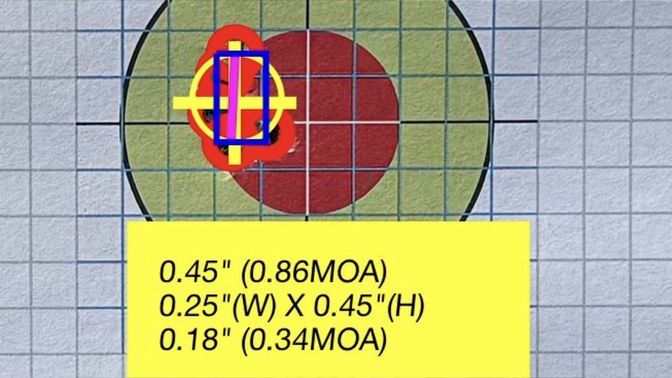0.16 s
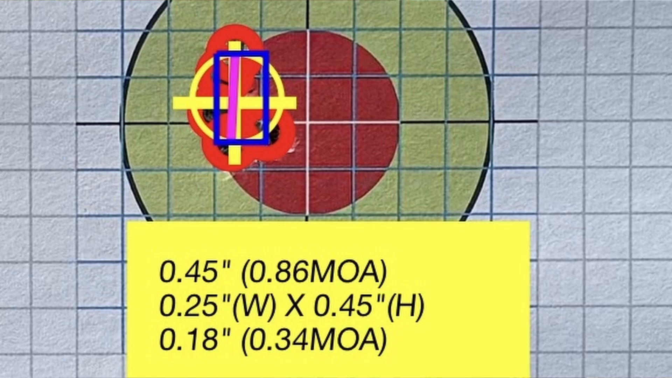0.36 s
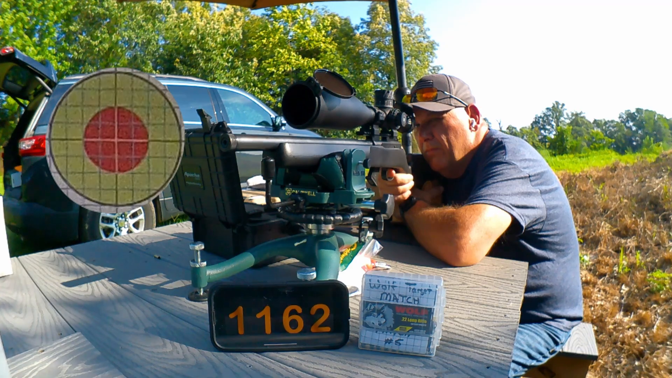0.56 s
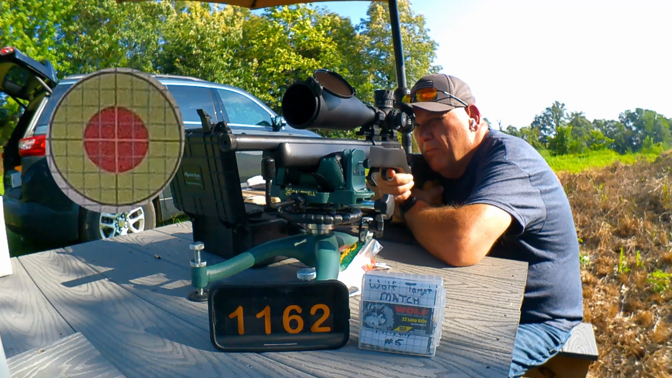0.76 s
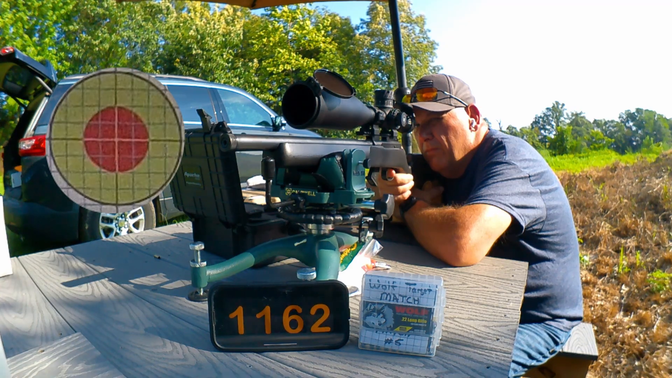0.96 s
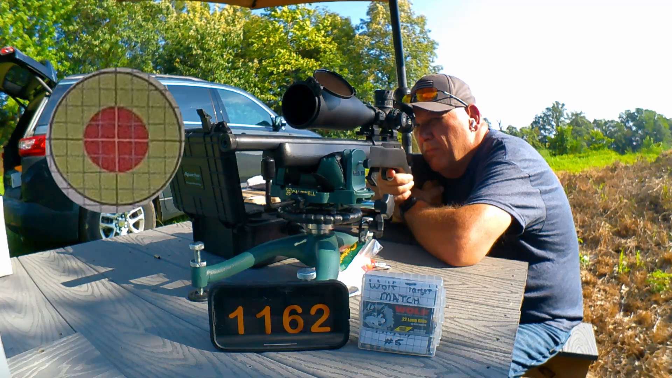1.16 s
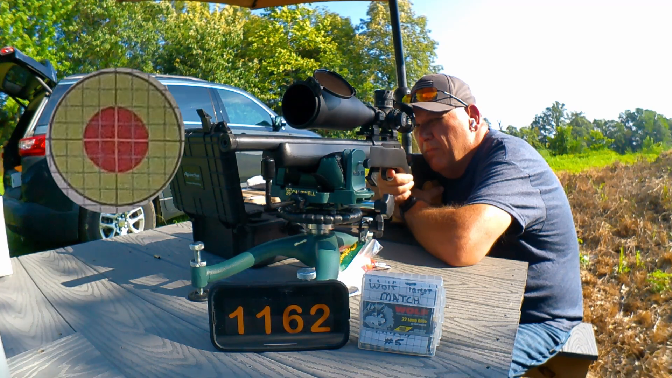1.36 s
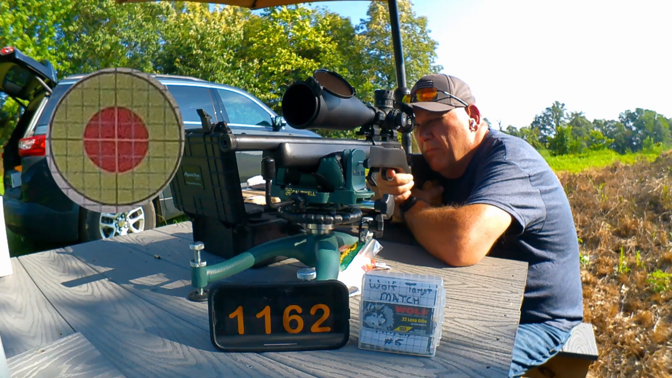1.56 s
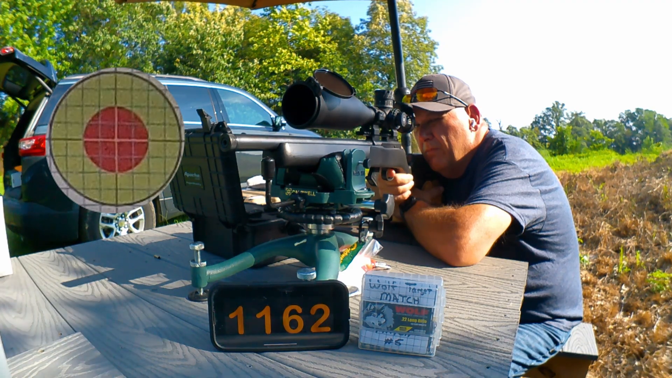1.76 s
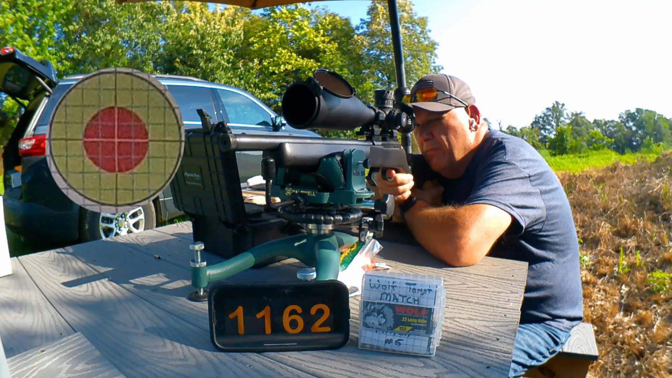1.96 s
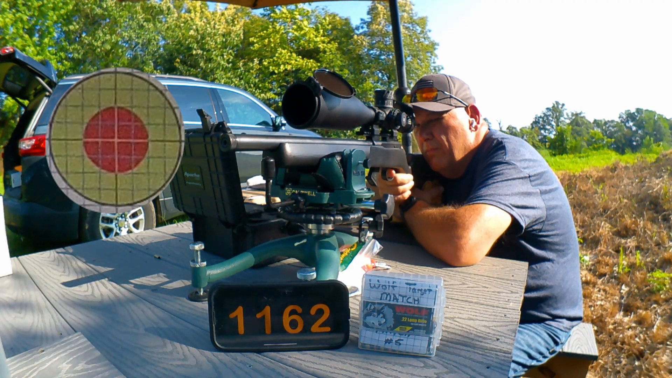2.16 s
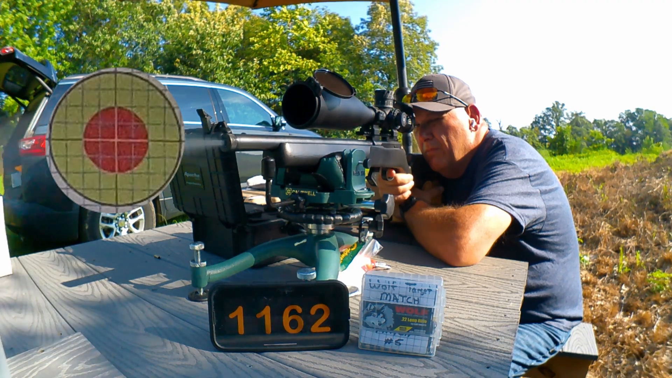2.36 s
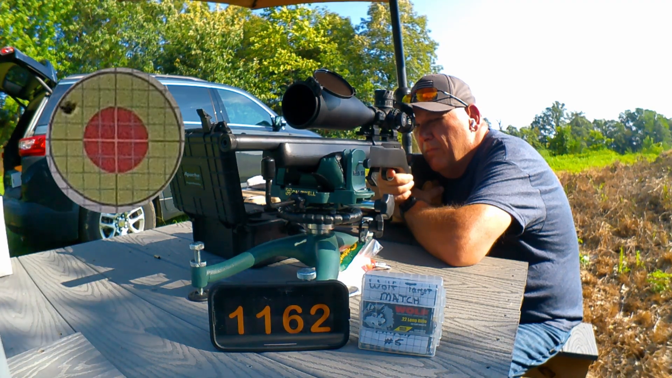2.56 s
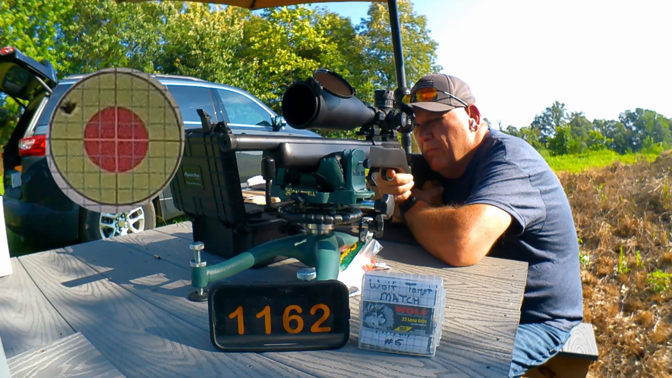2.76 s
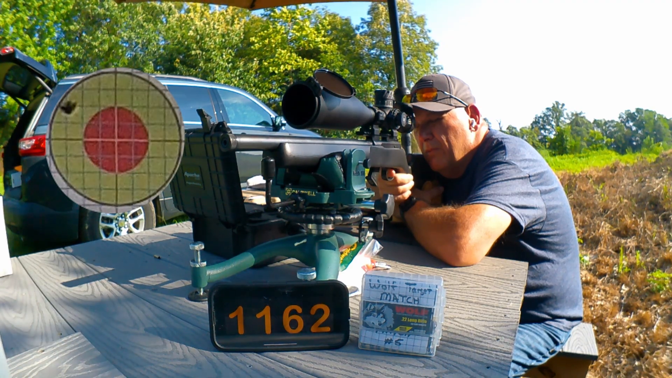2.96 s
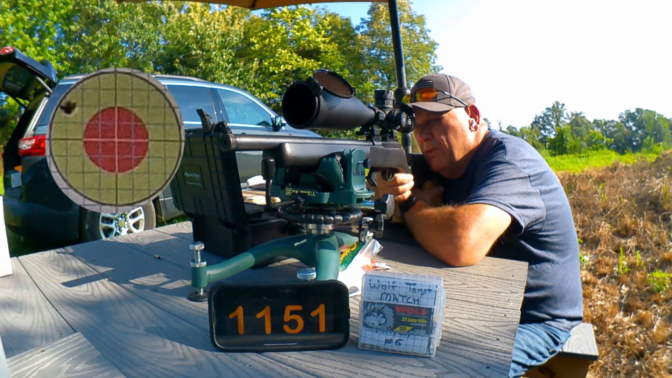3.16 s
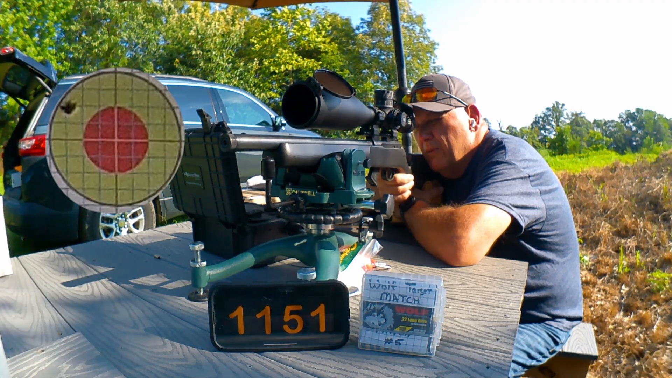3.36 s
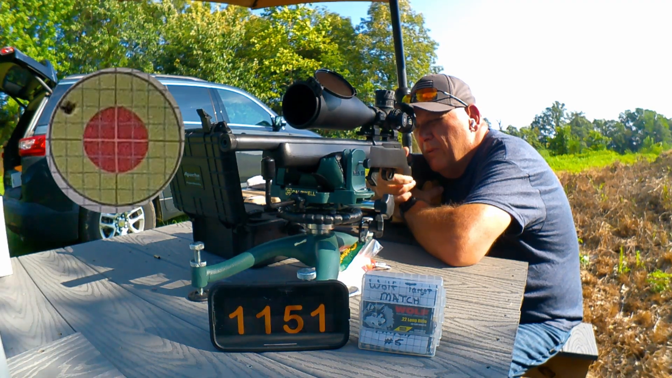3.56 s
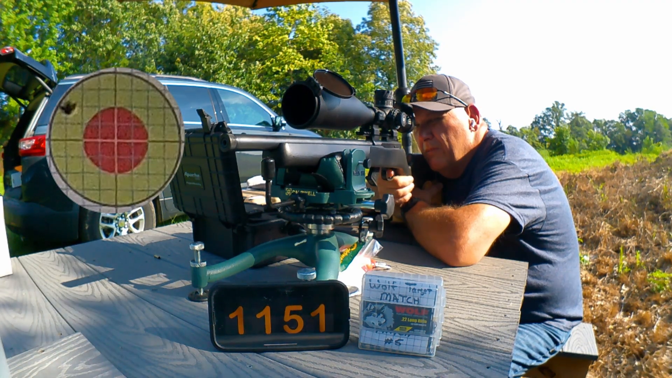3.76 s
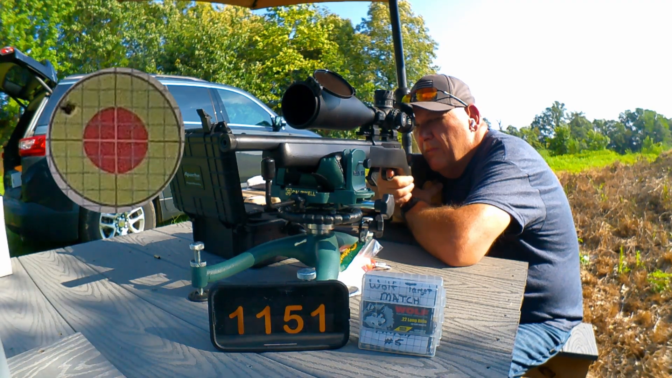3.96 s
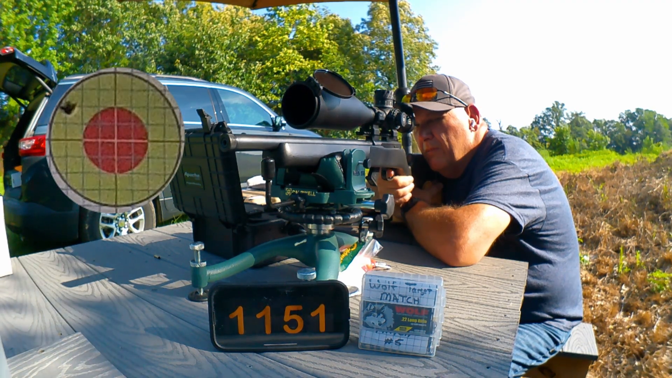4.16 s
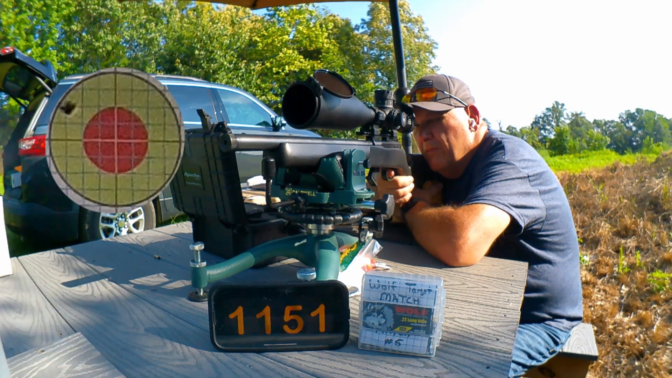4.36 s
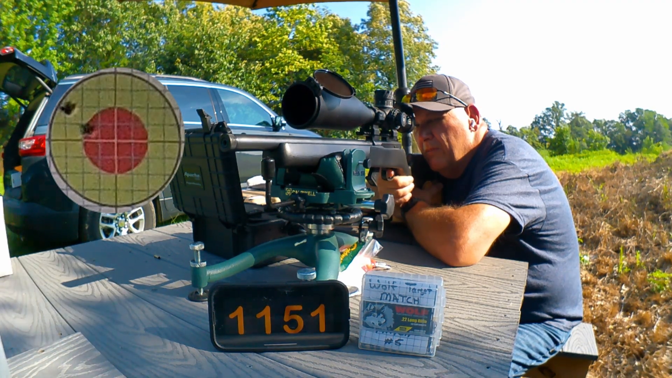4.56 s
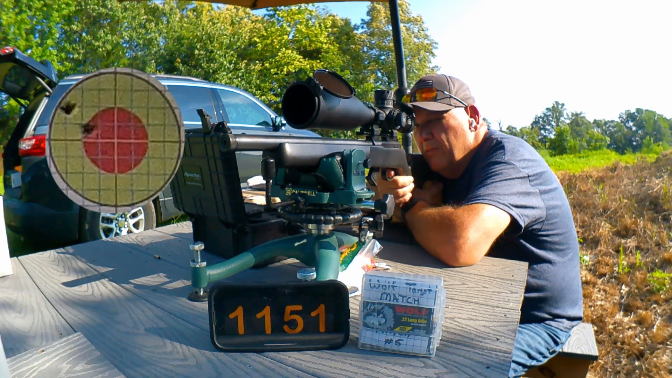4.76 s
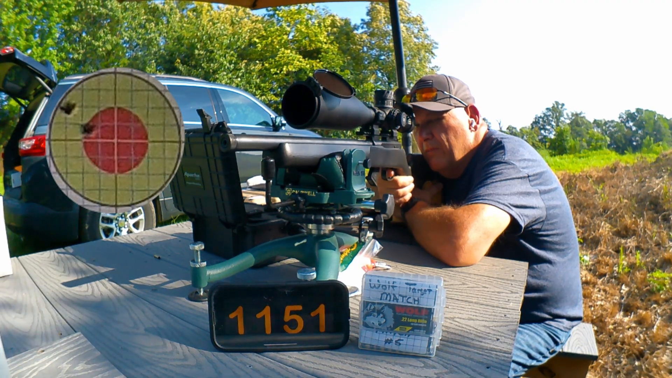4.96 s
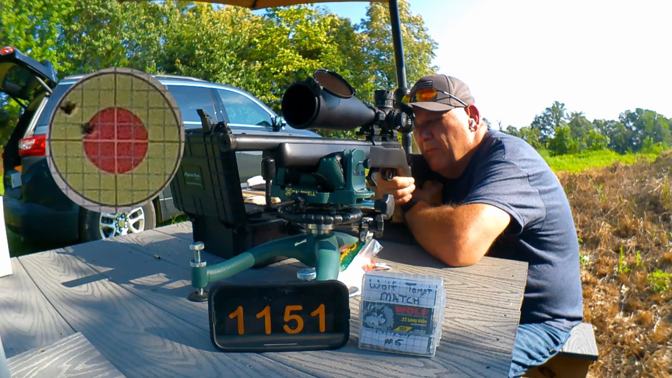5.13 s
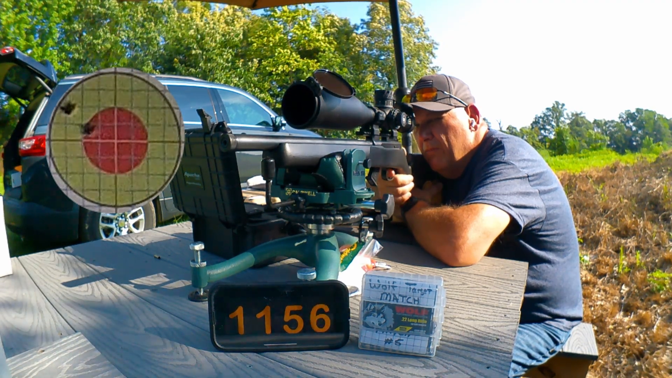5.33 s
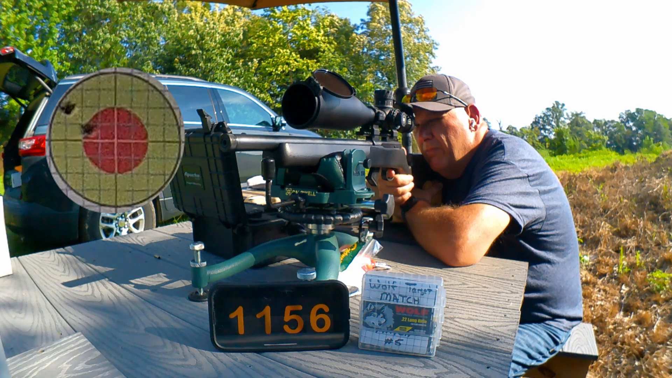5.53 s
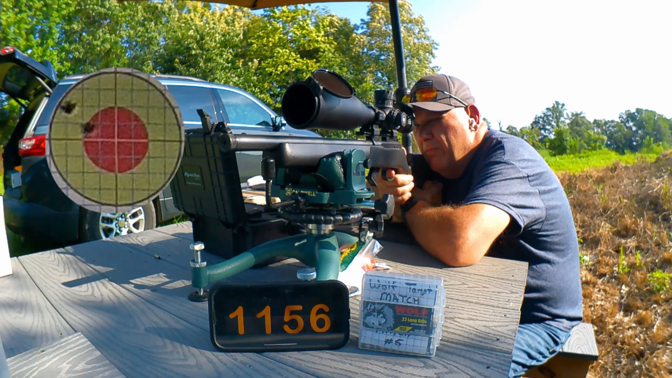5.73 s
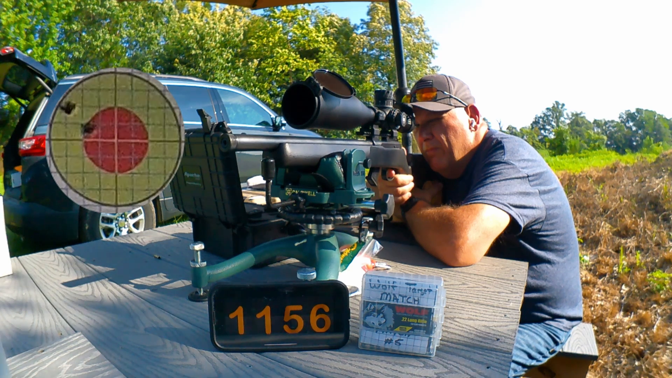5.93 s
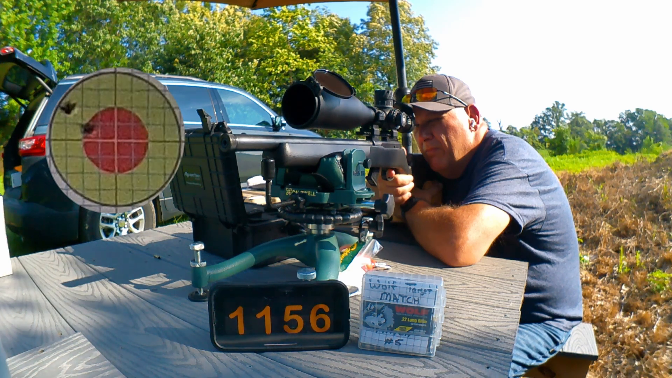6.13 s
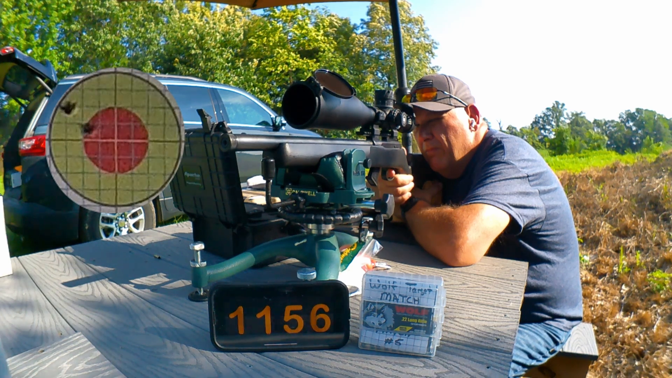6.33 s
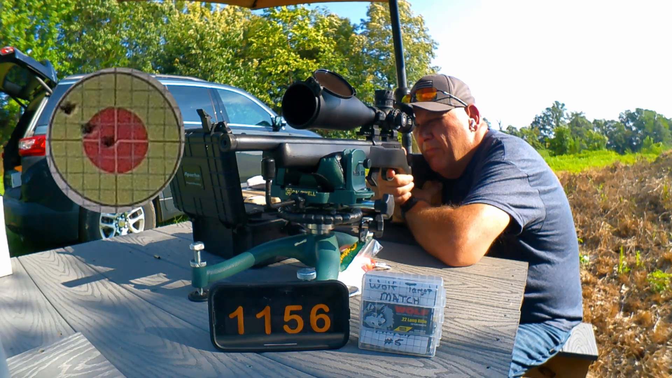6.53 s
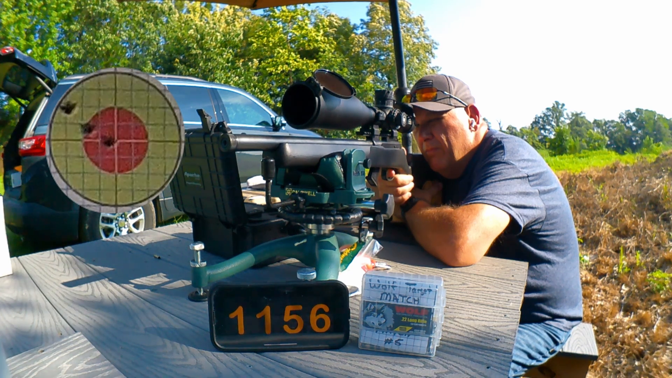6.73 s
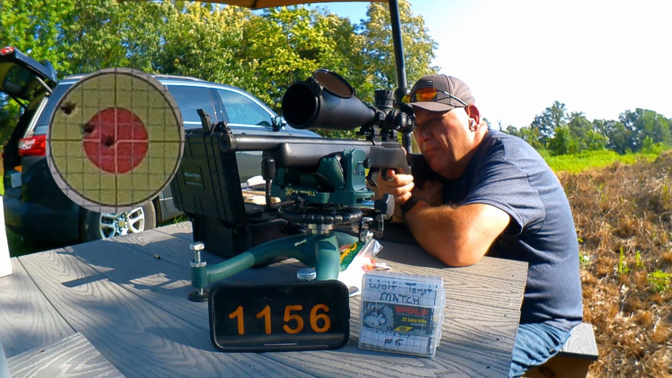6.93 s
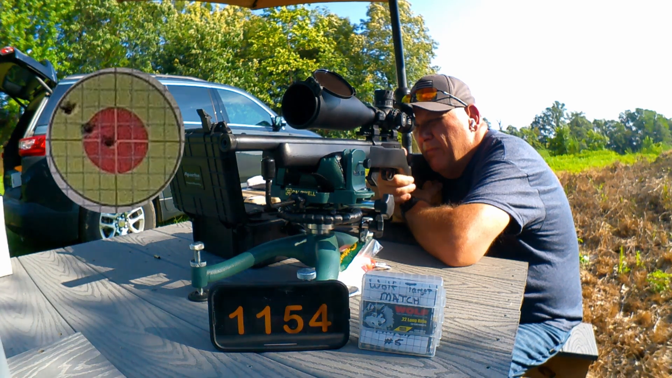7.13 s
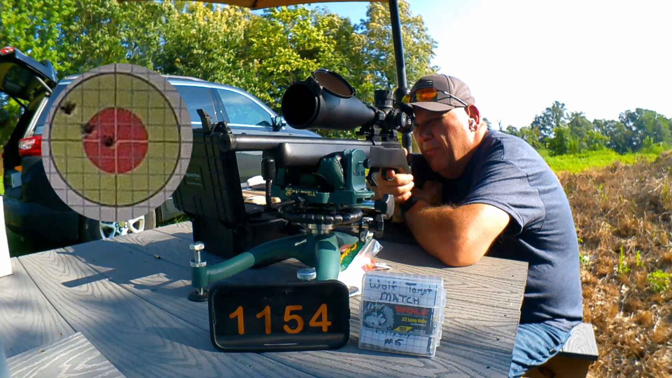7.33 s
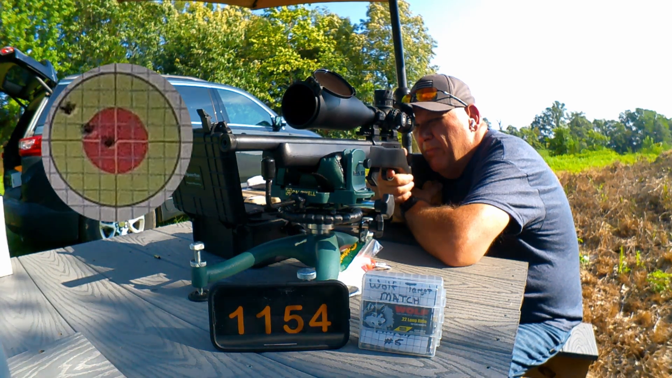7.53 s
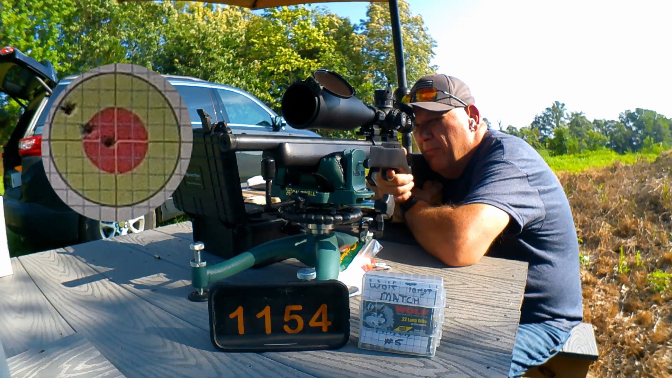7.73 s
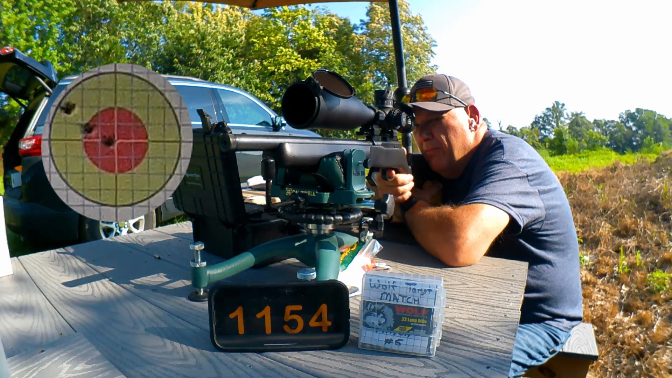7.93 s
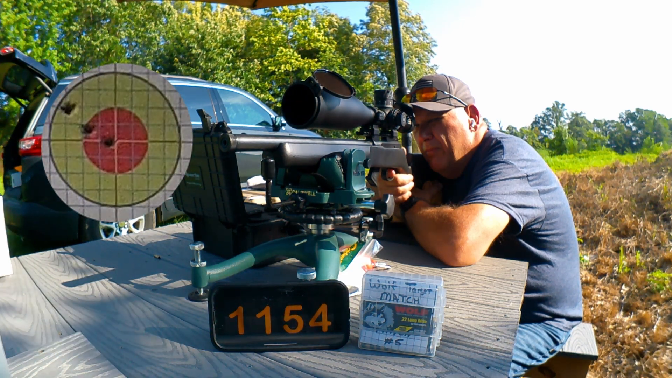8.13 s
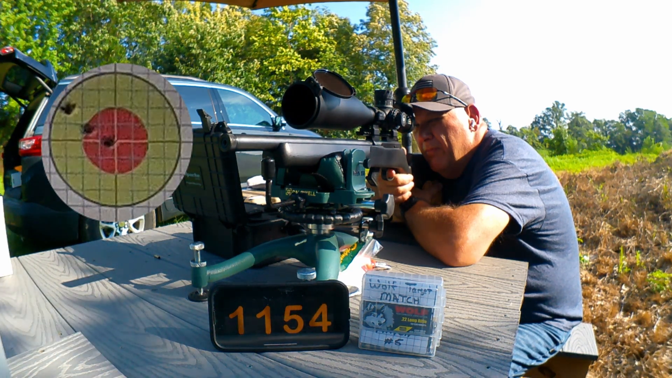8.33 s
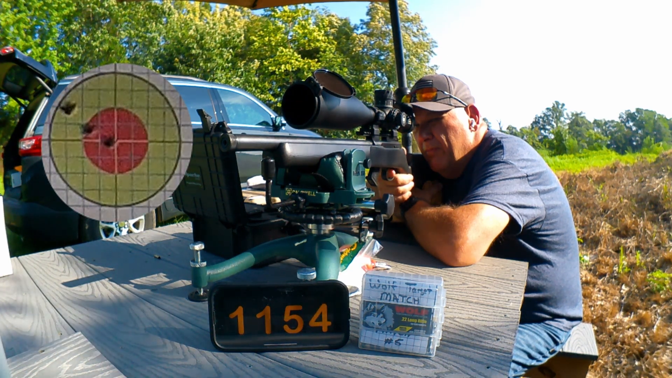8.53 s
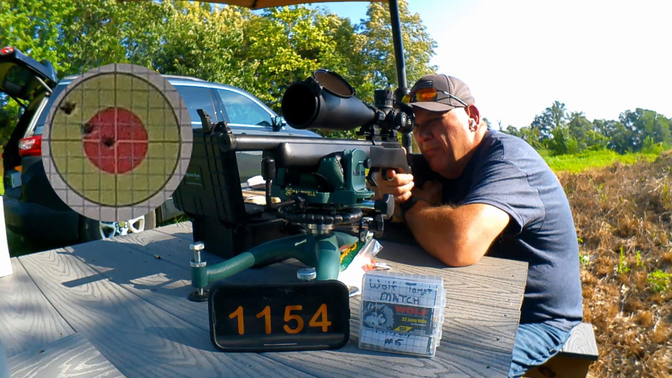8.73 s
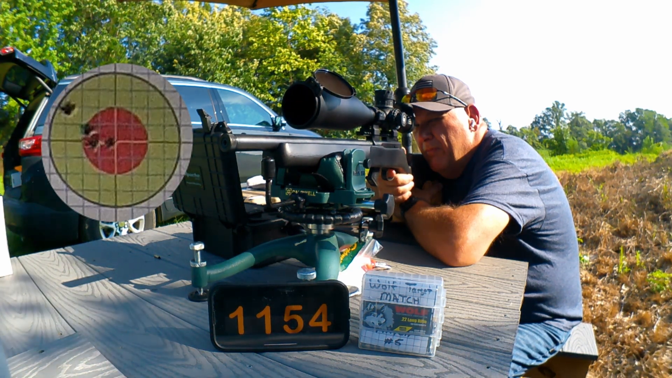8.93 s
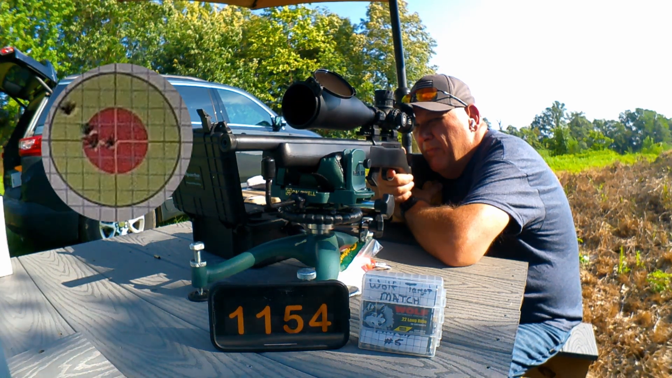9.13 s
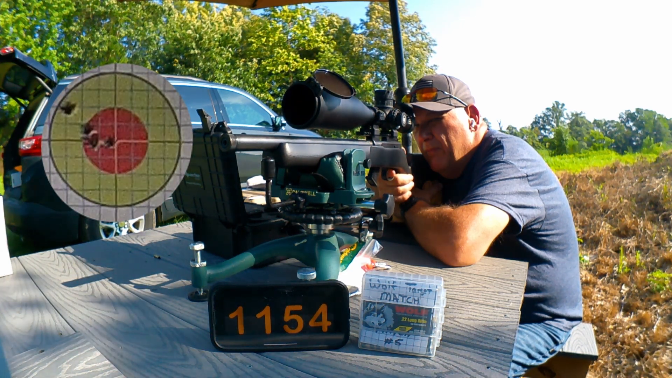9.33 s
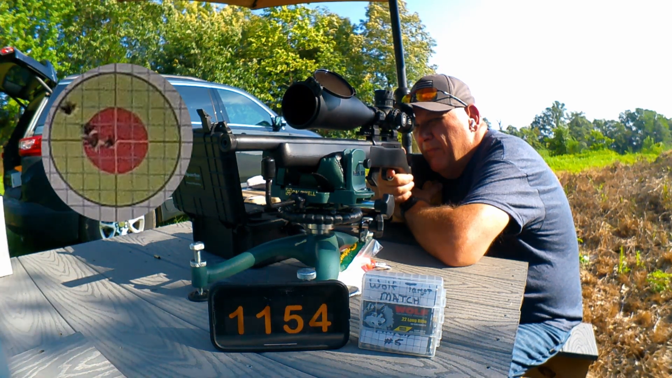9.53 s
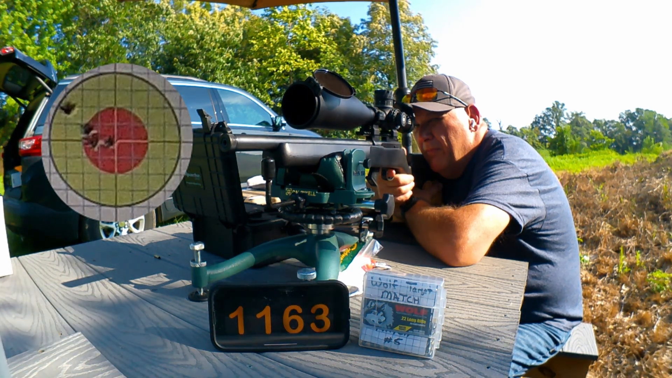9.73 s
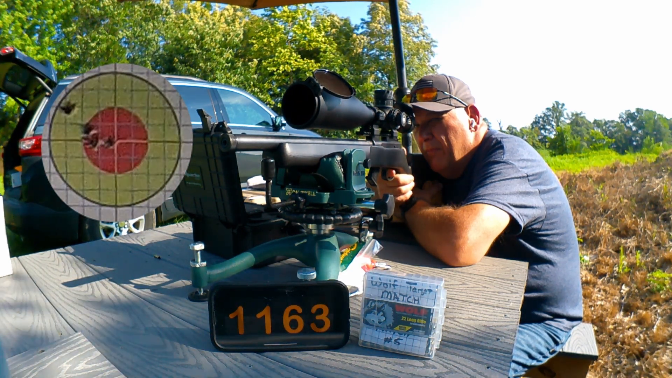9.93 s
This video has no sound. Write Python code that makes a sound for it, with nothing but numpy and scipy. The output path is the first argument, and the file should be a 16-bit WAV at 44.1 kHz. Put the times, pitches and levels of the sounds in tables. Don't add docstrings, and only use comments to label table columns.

```python
import sys
import numpy as np
from scipy import signal
from scipy.fft import rfft, irfft
from scipy.io import wavfile
from scipy.ndimage import uniform_filter1d

SR = 44100
rng = np.random.default_rng(int(sys.argv[2]) if len(sys.argv) > 2 else 0)


def makeup_ratio(level_db):
    decades = np.asarray(level_db, float) / 20
    return 10 ** decades


def waveform_to_disk(signal):
    frames = np.transpose(np.atleast_2d(signal))
    scaled = np.clip(frames, -1, 1) * 32767
    samples = np.round(scaled).astype(np.int16)
    wavfile.write(sys.argv[1], SR, samples)


N = 440559
t = np.arange(N) / SR

# start_s, peak_db, bolt_db, hush_before_s
SHOTS = [
    (2.3969, -1.5, -10, 0.014),
    (4.3974, -0.5, -8.5, .017),
    (6.3392, -1.5, -10, 0.015),
    (8.8662, -0.5, -9.5, 0.019),
]
# start_s, chorus_db, katydid_db,
# cricket_db, cricket_hz
MOMENTS = [
    (0, -65, -81, -92, 2880),
    (.535, -68, -77, -76, 2930),
    (1.995, -67.5, -76.5, -82, 2771),
    (3.604, -72.5, -81, -76, 3015),
    (5.308, -67, -78.5, -75.5, 5003),
    (6.335, -72, -82.5, -80, 2896),
    (7.279, -63, -72.5, -77.5, 2800),
    (9.628, -65, -73, -71.5, 2802),
]


def rifle():
    # delay_s, peak_db, ring_hz, t60_s
    reflectors = [(0.045, -1.5, 1012, .012), (0.0578, 0.5, 1256, 0.0038), (0.0614, -0.5, 1384, 0.0095),
                  (0.1558, -12.5, 1652, 0.0021), (0.2577, -9.5, 1470, 0.002), (0.26, -19, 4450, 0.0025),
                  (0.2646, -16.5, 5500, 0.003), (0.308, -19, 1060, 0.013), (0.3152, -19, 1660, 0.0099),
                  (0.349, -20.5, 1280, 0.014), (0.376, -22, 980, 0.028), (0.707, -37, 1140, 0.044),
                  (0.736, -35, 910, 0.017)]
    slam_delays = [.1035, .1042, .1047, .0857]
    # start_s, level_db, ring_hz, t60_s
    taps = [
        (5.254, -42.5, 1570, 0.024),
        (7.2438, -47, 1650, 0.022),
    ]
    overload_db, overload_s = 17.5, 0.015
    u = t[:round(1.25 * SR)]
    level_db = echo_db(u) + overload_db * np.exp(-(u / overload_s) ** 2)
    onset = np.minimum(u / 0.00012, 1)
    land, slaps, out = scatter(u), np.zeros(len(u)), np.zeros(N)
    for delay_s, *row in reflectors:
        add(slaps, delay_s - .001, slap(*row))
    cuts = np.append(np.transpose(MOMENTS)[0], N / SR)
    for (at, peak_db, bolt_db, _), slam_s in zip(SHOTS, slam_delays):
        paths = .92 * land + .39 * scatter(u)
        field = makeup_ratio(level_db) * paths * onset
        shot = makeup_ratio(peak_db) * (field.sum(0) + slaps)
        add(shot, slam_s - .01, bolt(bolt_db))
        next_cut = cuts[cuts > at][0]
        add(out, at, shot * (at + u < next_cut))
    for at, *row in taps:
        rattle = uniform_filter1d(uniform_filter1d(rng.standard_normal(3000), size=5), size=4)
        add(out, at, slap(*row) * (1 + 2.0 * rattle))
    return out


def bolt(db):
    # ring_hz, level_db, t60_s
    steel = [(4830, -6, 0.01), (6120, 2.5, 0.01), (9400, -18, 0.009), (10456, -5, 0.011),
             (13120, -12, 0.0063)]
    # delay_s, level_db, ring_hz, t60_s
    receiver = [
        (.001, -3.5, 2220, .01),
        (.0052, -6, 1900, .012),
        (0.0112, -7.5, 2100, .012),
    ]
    v, out = t[:3000], np.zeros(3800)
    for delay_s, knock_db in [(0, -8), (.004, -16), (.01, 2), (.0145, -13)]:
        ring = sum(makeup_ratio(d - 60 * v / min(t60, .012)) * np.sin(2 * np.pi * hz * v) for hz, d, t60 in steel)
        chatter = 1 + 2.1 * uniform_filter1d(rng.standard_normal(len(v)), size=4)
        ring *= np.minimum(v / 0.00043, 1) * chatter
        add(out, delay_s, makeup_ratio(db + knock_db) * ring / abs(ring).max())
    for delay_s, knock_db, hz, t60 in receiver:
        add(out, delay_s - .001, slap(db + knock_db, hz, t60))
    return out


def slap(db, hz, t60):
    u = t[:3000] - .001
    swell = np.where(u < 0, np.exp(-(3.1 * hz * u) ** 2), makeup_ratio(-60 * u / t60))
    return -makeup_ratio(db) * swell * np.cos(2 * np.pi * hz * u)


def echo_db(u):
    # delay_s, fall_db_per_s, body_db, thud_db, treble_db
    stretches = [(0.004, 330, -6, -15.5, -17), (.06, 299.5, -18.5, -33, -30), (.1, 806, -28, -40, -35.5),
                 (0.151, 69, -35.5, -44.5, -42), (.21, 100, -38.5, -48.5, -58.5),
                 (0.272, 155, -28, -40.5, -42), (0.309, 102.5, -28.5, -49.5, -55),
                 (.65, 60, -54.5, -88, -90), (.695, 92, -45, -88, -90), (.76, 55, -51.5, -72, -90),
                 (1.15, 30, -64, -67, -93)]
    fall_shares = [1.0, 1.5, 0.95]
    swell_db_per_s, power = 220, 0
    for s, fall, *levels in stretches:
        swell_db = swell_db_per_s * np.minimum(u - s, 0)
        fall_db = fall * np.c_[fall_shares] * np.maximum(u - s, 0)
        power = power + makeup_ratio(np.c_[levels] + (swell_db - fall_db)) ** 2
    return 10 * np.log10(power)


def scatter(u):
    # freq_hz, density_db
    near_body = [(180, -47), (300, -20.5), (510, -8), (996, -6), (1170, -6.5), (1370, -3.5), (1510, -8.5),
                 (1710, -2.5), (1910, -4), (3800, -19.5), (4940, -52), (8360, -120)]
    # freq_hz, density_db
    grass_body = [(180, -38), (300, 0), (521, -3.5), (757, -4.5), (1930, 4), (2430, -3.5), (2780, 2),
                  (3600, -23), (4680, -49), (7920, -120)]
    # freq_hz, density_db
    tree_body = [(180, -64), (300, -17), (486, -13), (704, -2), (830, -4), (1020, 1), (1400, -2),
                 (1790, -1.5), (3500, -21.5), (4550, -46), (7700, -120)]
    # freq_hz, density_db
    far_body = [(210, -58), (350, -21), (385, -27), (445, -16.5), (728, -3.5), (1180, 0), (1910, -8.5),
                (3500, -35), (4550, -65), (7700, -120)]
    # freq_hz, density_db
    low_thud = [(15, -40), (25, -7.5), (71, -19), (103, -20), (172, -5.5), (233, -8.5), (271, -2), (299, 0),
                (441, -12), (500, -6), (650, -38), (1100, -120)]
    # freq_hz, density_db
    near_treble = [(2240, -31), (3800, -3.5), (5560, 0.5), (5770, -2.5), (9090, -16.5), (15000, -20.5),
                   (16000, -30.5), (16500, -54.5)]
    # freq_hz, density_db
    tree_treble = [(2240, -47), (3800, -5), (5010, 1), (6900, -9.5), (7700, -21), (10700, -21.5),
                   (15800, -37), (16200, -48), (16500, -62.5)]
    a, b, c, d, e, f, g = rng.standard_normal((len(u), 7)).T * makeup_ratio(2.6 * rng.exponential(1, len(u)))
    grass, trees, woods = (u - .09) / 0.034, (u - .18) / 0.068, (u - .3) / 0.51
    body = blended(coloured(a, near_body), coloured(g, grass_body), grass)
    body = blended(body, coloured(b, tree_body), trees)
    body = blended(body, coloured(c, far_body), woods)
    treble = blended(coloured(d, near_treble), coloured(e, tree_treble), grass)
    return np.array([body, coloured(f, low_thud), treble])


def cicada():
    # start_s, end_s, buzz_db, rasp_db
    songs = [
        (0, 0.53, -3.5, -23),
        (7.281, 9.632, -1.5, -6),
    ]
    # low_hz, width_hz, rise_hz
    bellies = [
        (2490, 280, 1200),
        (2480, 2400, 2400),
    ]
    # clicks_per_s, second_click_sign
    membranes = [
        (452, -1),
        (438, 1),
    ]
    # start_s, lowest_s, swings_per_s, quickening_per_s2
    throbs = [
        (0, .049, 11.9, 2.2),
        (7.281, 7.304, 11.28, .44),
    ]
    # time_s, level_db
    effort = [(0, -51.5), (.53, -54), (7.28, -54.5), (8.5, -52.5), (9.63, -55)]
    wide = [(1500, -38.5), (2600, -4.5), (4000, -1.5), (5300, -8.0), (6700, -7.5), (8200, -29.5), (11000, -68.0)]
    rows = np.array(throbs)
    start, lowest, swings, quicken = rows[np.maximum(np.searchsorted(rows[:, 0], t) - 1, 0)].T
    turn = swings * (t - lowest) + quicken / 2 * (t - lowest) ** 2 + .02 * drift(size=2000)
    tight = np.sin(np.pi * turn) ** 2
    rest = 1 - .75 * np.exp(-((turn % 1 - .42) / .1) ** 2)
    out = np.zeros(N)
    for (begin, end, buzz_db, rasp_db), (low_hz, width_hz, rise_hz), (per_s, sign) in zip(songs, bellies, membranes):
        count = np.floor(np.cumsum(per_s * (1 + .015 * drift(size=400))) / SR)
        clicks = np.diff(count, prepend=0) * np.where(count % 2, sign, 1)
        clicks = evened(clicks * makeup_ratio(2.5 * rng.standard_normal(N))) + .75 * rng.standard_normal(N)
        belly = mode(clicks, low_hz + rise_hz * tight ** 4.6, width_hz, 1200) * (1 - tight) ** 2.4
        buzz = makeup_ratio(buzz_db) * coloured(clicks, wide) * rest
        rasp = makeup_ratio(rasp_db) * mode(clicks, 4900, 1300, 1300) * np.exp(-((turn % 1 - .6) / .1) ** 2)
        upper = makeup_ratio(-12) * mode(clicks, 3100 + 2200 * tight, 1000, 900) * rest
        out += (belly + upper + buzz + rasp) * ((t > begin) & (t < end))
    return makeup_ratio(np.interp(t, *np.transpose(effort)) - 4.0) * out


def wind():
    # centre_s, level_db, half_length_s
    gusts = [(0.0, -55, 0.14), (0.375, -54, 0.1), (0.696, -55, 0.048), (.86, -50.5, .08),
             (1.017, -48, 0.07), (1.367, -60, 0.05), (1.578, -54, 0.075), (1.765, -72, 0.036),
             (2.303, -63, 0.15), (2.88, -54, 0.097), (3.324, -56.5, 0.25), (3.8, -77.5, 0.13),
             (4.3, -69, 0.084), (5.273, -52, 0.034), (6.841, -61.5, 0.05), (7.263, -58, .05),
             (7.489, -63, 0.033), (7.663, -68.5, 0.043), (8.04, -70, .1), (8.746, -73, 0.061),
             (9.322, -67, 0.034), (9.815, -70, 0.066)]
    breeze_db, wake_db, wake_db_per_s = -72.5, -48, 90
    lumps = rng.standard_normal(N) * makeup_ratio(3.2 * drift(size=700))
    colour = [(12, -31), (30, -4.5), (70, -4), (140, -11.5), (260, -25.5), (500, -57.5)]
    level = makeup_ratio(breeze_db + 1.5 * drift(size=3000))
    for s, db, half_s in gusts:
        level = level + makeup_ratio(db) * np.exp(-((t - s) / half_s) ** 2)
    for at, *_ in SHOTS:
        level = level + makeup_ratio(wake_db - wake_db_per_s * abs(t - at)) * (t > at)
    return level * coloured(lumps, colour)


def meadow():
    # freq_hz, density_db
    air_colour = [(18, -45.5), (30, -12.5), (96, -4.5), (420, -10), (455, -11), (694, -13.5), (772, -14.5),
                  (835, -15.5), (2530, -21.5), (3050, -21), (3760, -31), (15200, -37.5), (16500, -48.5)]
    air_steps = [-1.9, -0.86, -0.9, -.2, -1, -1.3, 0.88, 0.37]
    # freq_hz, density_db
    chorus_colour = [(2240, -40), (3800, -3.5), (3990, -5.5), (4320, -1.5), (4850, 0.5), (5340, 2.5),
                     (6390, -3.5), (6950, -8.5), (8000, -18.5), (10400, -46.5), (17600, -120)]
    cricket_widths = [300, 500, 120, 303.4, 800, 498, 300, 250]
    # level_db, pitch_hz
    drones = [(-65, 170), (-69, 64), (-67.5, 69), (-70.5, 120), (-65.5, 130), (-65.5, 270), (-61, 278),
              (-58.5, 170)]
    # freq_hz, width_hz, level_db
    wing_modes = [(5420, 190, 0), (6100, 78, -2), (6060, 130, -9)]
    air_db, strokes_per_s, stroke_s = -59.5, 13.33, 2.105
    start, *columns = np.transpose(MOMENTS)
    moment = np.searchsorted(start, t + 1e-4) - 1
    chorus_db, katydid_db, cricket_db, cricket_hz = (c[moment] for c in columns)
    drone_db, drone_hz = np.array(drones)[moment].T
    since_cut_s, falling = t - start[moment], moment == 2
    cricket_hz = cricket_hz + 250 * np.exp(-since_cut_s / .05) * falling
    cricket_db = cricket_db + 10.0 * np.exp(-(since_cut_s / .5) ** 2) * falling
    a, b, c, d, e = rng.standard_normal((N, 5)).T
    air = makeup_ratio(air_db + np.take(air_steps, moment) + .6 * drift(size=4000)) * coloured(a, air_colour)
    chorus = makeup_ratio(chorus_db + 1.2 * drift(size=1500)) * coloured(b, chorus_colour)
    cricket = sum((moment == k) * mode(c, cricket_hz, width, width) for k, width in enumerate(cricket_widths))
    cricket = makeup_ratio(cricket_db + 2.0 * drift(size=900)) * cricket
    drone = makeup_ratio(drone_db + 0.5 * drift(size=3000)) * mode(d, drone_hz, 110, 110)
    strokes = np.exp(3.0 * np.cos(2 * np.pi * strokes_per_s * (t - stroke_s))) * makeup_ratio(1.2 * drift(size=2500))
    wings = sum(makeup_ratio(db) * mode(e, hz, width, width) for hz, width, db in wing_modes)
    katydid = makeup_ratio(katydid_db) * evened((evened(strokes) + .3) * wings)
    return air + chorus + cricket + drone + katydid


def evened(x):
    return x / np.sqrt(np.mean(x ** 2) + 1e-20)


def coloured(x, points):
    f, db = np.transpose(points)
    hz = np.fft.rfftfreq(len(x), 1 / SR)
    gain = makeup_ratio(np.interp(np.log(hz + 1), np.log(f + 1), db))
    return evened(irfft(rfft(x) * gain, len(x)))


def resonate(x, hz, width):
    turn = np.exp(2j * np.pi * np.cumsum(hz * np.ones(len(x))) / SR)
    r = np.exp(-np.pi * width / SR)
    return 2 * (turn * signal.lfilter([1 - r], [1, -r], x / turn + 1e-18)).real


def mode(x, hz, width, second_width):
    return evened(resonate(resonate(x, hz, width), hz, second_width))


def drift(size):
    return evened(uniform_filter1d(uniform_filter1d(rng.standard_normal(N), size), size))


def blended(a, b, share):
    share = np.clip(share, 0, 1)
    return np.sqrt(1 - share) * a + np.sqrt(share) * b


def add(mix, s, sound):
    part = mix[round(s * SR):][:len(sound)]
    part += sound[:len(part)]


def scene():
    return (rifle() + cicada() + wind() + meadow())[None]


def top_cut(x):
    return signal.sosfilt(signal.butter(12, 17130, fs=SR, output="sos"), x)


def record(dry):
    ceiling, offset, edge_hz = 0.45, .0019, 16100
    push_db, push_s = -19.5, 0.00063
    lead_in_db, lead_in_db_per_s = -19, 3000
    x = ceiling * np.tanh((abs(dry) / ceiling) ** 3) ** (1 / 3) * np.sign(dry) + offset
    grit = signal.lfilter([.3], [1, -.7], rng.standard_normal(N))
    for at, _, _, hush_s in SHOTS:
        lead_in = makeup_ratio(lead_in_db - lead_in_db_per_s * np.abs(at - t)) * (t > at - .004) * grit
        lag = np.maximum(t - at, 0) / push_s
        x = x + makeup_ratio(push_db) * lag * np.exp(1 - lag)
        x = np.where((t > at - hush_s) & (t < at), lead_in, x)
    x = signal.oaconvolve(x, signal.firwin(255, edge_hz, fs=SR)[None], "same")
    x = x * (t < 9.985)
    return top_cut(x)


dry = scene()
out = record(dry)
waveform_to_disk(out)
```